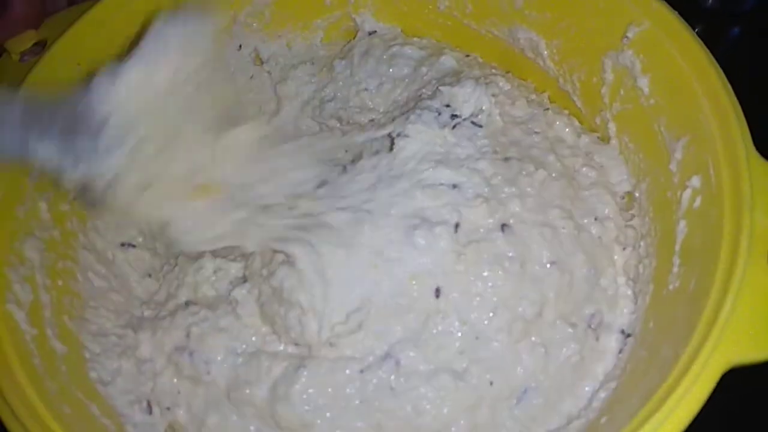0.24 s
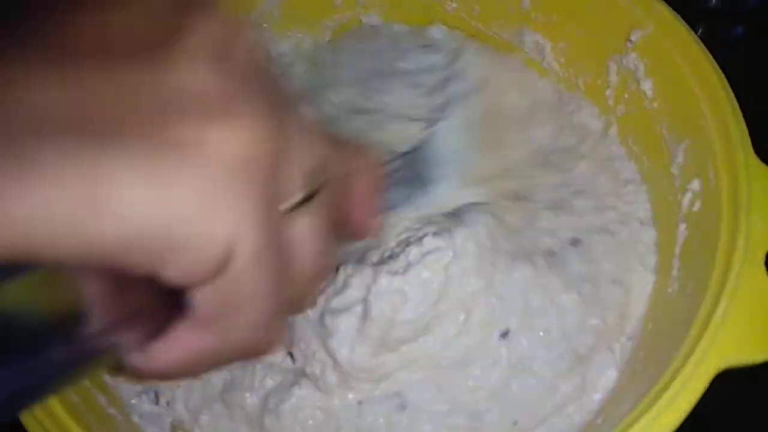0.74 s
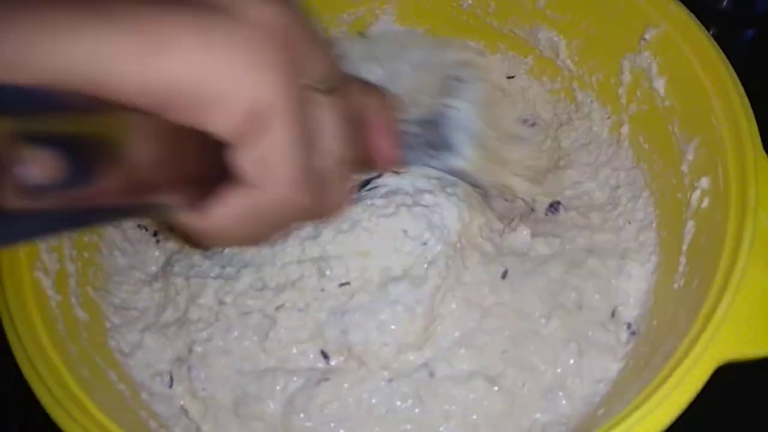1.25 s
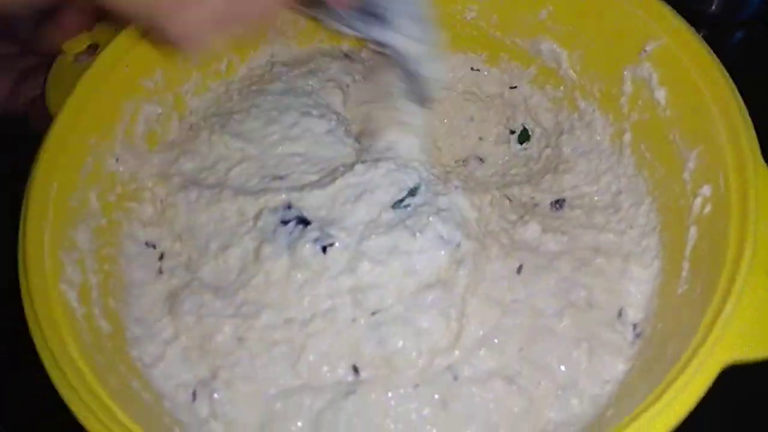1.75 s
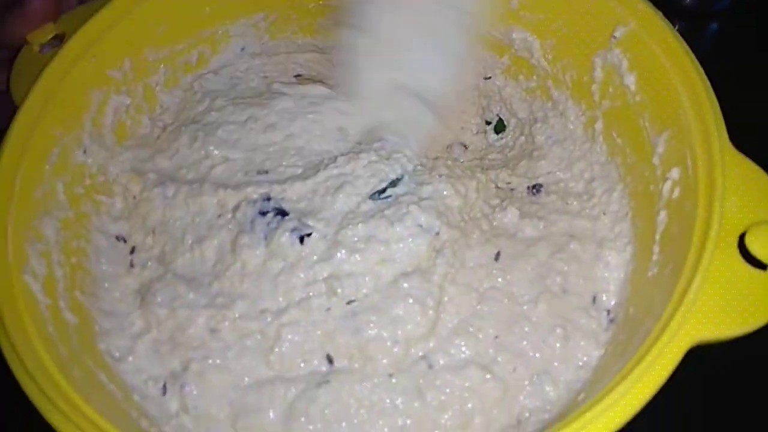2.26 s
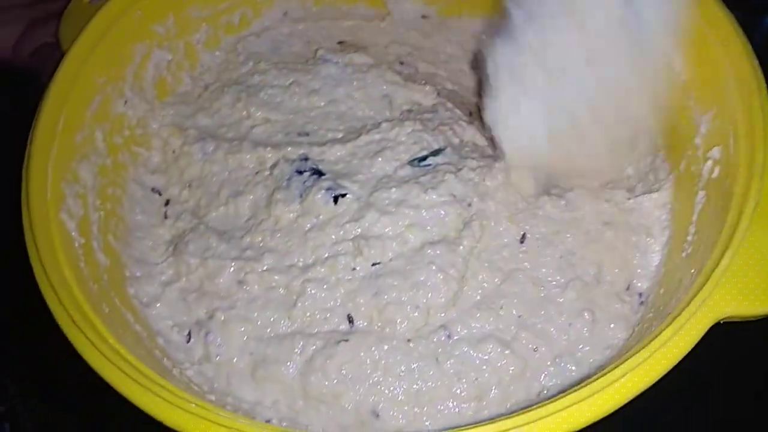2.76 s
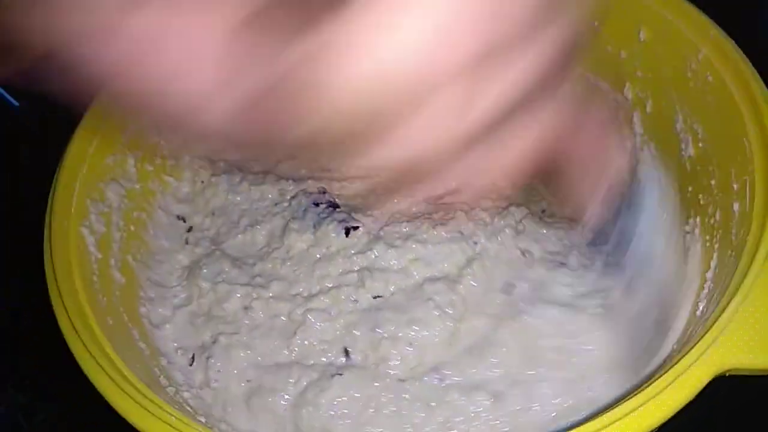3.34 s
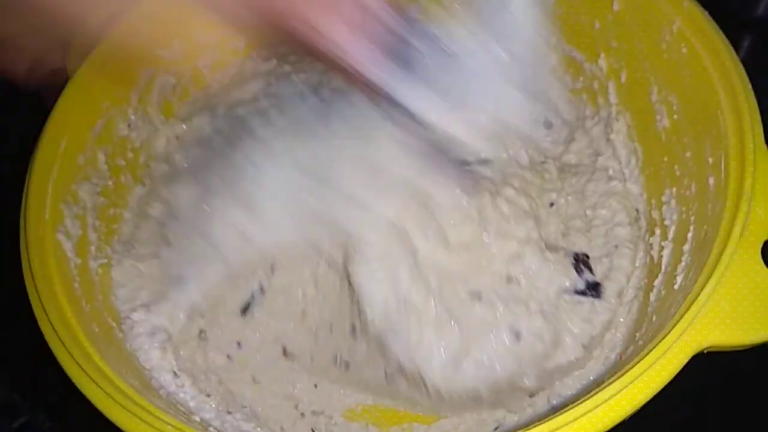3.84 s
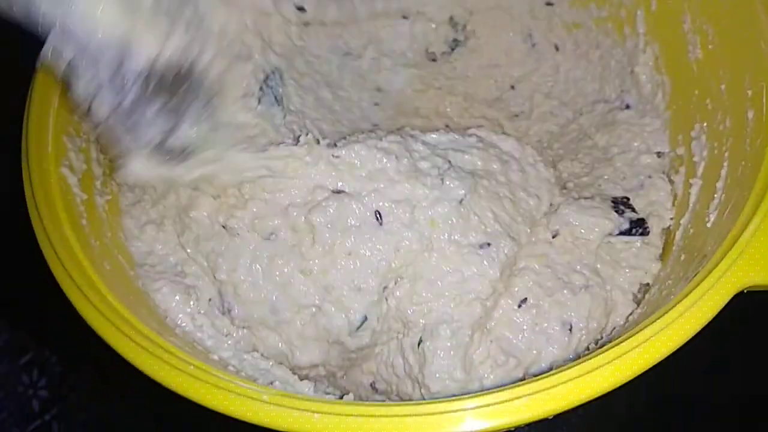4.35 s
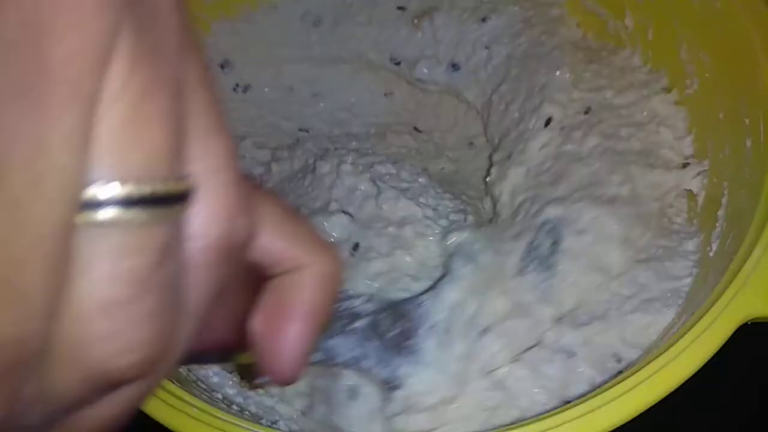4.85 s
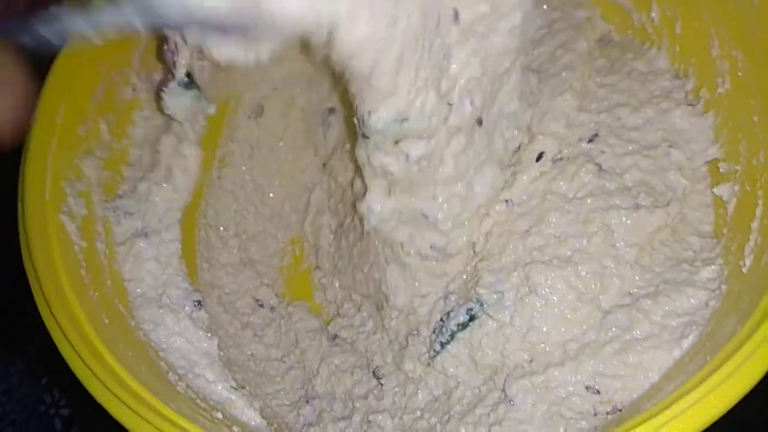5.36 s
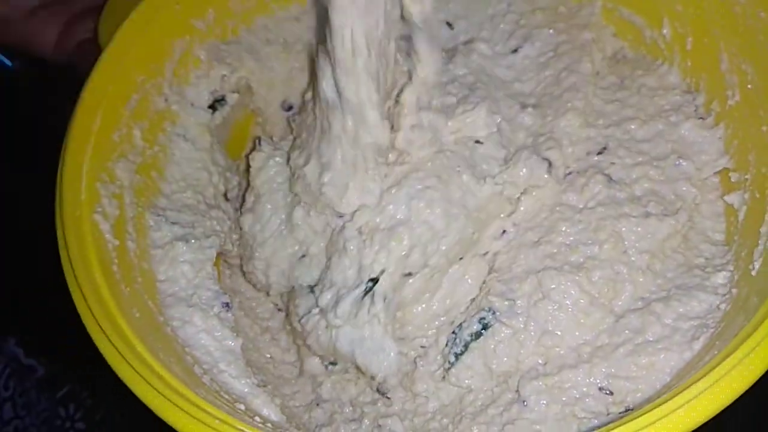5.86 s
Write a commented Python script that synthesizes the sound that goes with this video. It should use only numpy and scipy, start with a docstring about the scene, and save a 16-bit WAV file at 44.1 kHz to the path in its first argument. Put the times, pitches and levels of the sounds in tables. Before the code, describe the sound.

A spoon folds thick wet batter in a plastic bowl, with sticky squelches, fine bubbly crackle and occasional dull knocks, close up in a small kitchen.

```python
"""Thick wet batter folded with a spoon in a plastic bowl, heard close by in a small hard-walled kitchen.
Each push squeezes the batter into a squelch and tears it open in a crackle of tiny bubbles.
Larger films snap, heavier flaps smack, trapped air gurgles and the bowl rubs in two low tones.
The spoon knocks the bowl, which thumps and judders; wall echoes and low room modes ring on over faint noise."""
import sys
import numpy as np
from scipy import signal
from scipy.fft import rfft, irfft
from scipy.io import wavfile
from scipy.ndimage import map_coordinates

SR = 44100
rng = np.random.default_rng(int(sys.argv[2]) if len(sys.argv) > 2 else 0)


def store_wav(level_fs):
    """Save 16-bit WAV to argv[1]."""
    pcm = np.round(np.clip(np.atleast_2d(level_fs), -1, 1) * 32767)
    wavfile.write(sys.argv[1], SR, pcm.T.astype(np.int16))


N = 269451
TIME = np.arange(N) / SR
TOP_HZ = 16000


def amp(db):
    """Decibels to gain."""
    return 10 ** (np.asarray(db) / 20)


def unit(x):
    """Scale to rms 1."""
    return x / np.sqrt(np.mean(x ** 2))


def lookup(points, hz):
    """Read (Hz, value) points on a log-frequency axis."""
    f, value = np.transpose(points)
    return np.interp(np.log(np.maximum(hz, 1)), np.log(f), value)


def convolve(x, response):
    """Pass a sound through an impulse response."""
    return signal.oaconvolve(x, response)[:len(x)]


def colour(x, points, size=2048):
    """Minimum-phase filter through (Hz, dB) points, built by folding the cepstrum."""
    hz = np.arange(size // 2 + 1) * SR / size
    cepstrum = irfft(np.log(amp(lookup(points, hz))))
    cepstrum[1:size // 2] *= 2
    cepstrum[size // 2 + 1:] = 0
    return convolve(x, irfft(np.exp(rfft(cepstrum))))


def band(x, hz, ratio, order=1):
    """Band-pass from hz / ratio to hz * ratio, capped at TOP_HZ; rms 1."""
    edges_hz = [hz / ratio, min(hz * ratio, TOP_HZ)]
    return unit(signal.sosfilt(signal.butter(order, edges_hz, "band", fs=SR, output="sos"), x))


def fade(t, t60):
    """Exponential decay, 60 dB down after t60."""
    return np.exp(-np.log(1000) * t / t60)


def ring(t, hz, t60):
    """One damped mode."""
    return np.sin(2 * np.pi * hz * t) * fade(t, t60)


def add(track, s, sound):
    """Mix a sound in at time s."""
    start = max(int(s * SR), 0)
    track[start:start + len(sound)] += sound[:N - start]


def prickle(per_s, spread_db):
    """Air cells too small to ring: bare clicks of very uneven size."""
    born = rng.random(N) < per_s / SR
    size = amp(-spread_db * np.log(rng.random(N) + .01))
    return born * size * rng.choice([-1, 1], N)


def bubbles(low_hz, high_hz, per_s, spread_db, cycles, rise):
    """Rain of short-lived bubbles, each rising in pitch as it opens; most are tiny, a few stand out."""
    out = np.zeros(N)
    for when, pitch, size, life in rng.random((int(per_s * N / SR), 4)):
        hz = min(low_hz * (high_hz / low_hz) ** pitch, TOP_HZ)
        t60 = cycles * (.5 + life) / hz
        t = TIME[:int(t60 * SR) + 2]
        level = amp(-spread_db * np.log(size + .01)) * np.sqrt(hz)
        tone = np.sin(2 * np.pi * hz * t * (1 + rise * t / t60))
        add(out, when * N / SR, level * tone * fade(t, t60))
    return out


def clumps(per_s, depth_db):
    """Uneven gain, rms 1: random dB levels joined by straight lines between random times."""
    knots = np.cumsum(rng.exponential(1 / per_s, int(2 * per_s * N / SR)))
    return unit(amp(depth_db * np.interp(TIME, knots, rng.standard_normal(len(knots)))))


BITE_T60_S = 0.14


def swell(t, attack_s, length_s, bite, sag_db_per_s, release_db_per_s):
    """Gain over one push: swells, bites hardest at first, sags, then falls faster after length_s."""
    onset = np.minimum(t / attack_s, 1) * (1 + bite * fade(t, BITE_T60_S))
    return onset * amp(-sag_db_per_s * t - release_db_per_s * np.maximum(t - length_s, 0))


# spoon pushes into batter, which goes on tearing behind it: t/s, attack/s, pressing length/s,
# tearing length/s, relative levels of fine crackle/dB, coarse crackle/dB, squelch/dB, hollow f/Hz
PUSHES = [(0.0, 0.0009, 0.043, 0.2, -43.5, -47.5, -44, 720),
          (0.249, 0.042, 0.18, 0.24, -40, -43.5, -44.5, 770),
          (0.638, 0.0086, 0.03, 0.058, -57.5, -69, -74, 700),
          (0.696, 0.0061, 0.088, 0.087, -45.5, -45, -56.5, 700),
          (0.784, 0.014, 0.045, 0.013, -36.5, -54.5, -35, 517),
          (0.862, 0.053, 0.08, 0.095, -38.5, -52, -39.5, 606),
          (1.107, 0.026, 0.12, 0.086, -48, -54.5, -50.5, 660),
          (1.233, 0.078, 0.11, 0.19, -36.5, -35.5, -38.5, 970),
          (1.731, .005, 0.18, 0.049, -39.5, -52, -34, 544),
          (1.771, 0.0073, .025, 0.016, -24, -58, -49.5, 750),
          (2.189, 0.03, 0.19, 0.19, -35.5, -36.5, -33, 740),
          (2.68, 0.0028, 0.16, 0.14, -35, -37.5, -25, 682),
          (3.14, 0.0074, 0.23, 0.16, -41.5, -41.5, -36, 538),
          (3.329, 0.011, 0.063, 0.074, -40.5, -38.5, -49, 900),
          (3.408, 0.026, 0.23, 0.28, -34, -43.5, -34.5, 650),
          (3.797, .03, 0.051, 0.066, -58, -62, -75, 790),
          (3.878, 0.013, 0.059, 0.037, -44, -48.5, -46, 900),
          (3.957, .004, 0.091, .15, -43.5, -50.5, -37, 500),
          (4.069, 0.045, 0.09, 0.13, -42, -45, -45.5, 730),
          (4.378, 0.025, 0.26, 0.24, -50, -56.5, -59.5, 1250),
          (4.586, .015, 0.11, 0.12, -50, -54.5, -49, 780), (4.715, 0.053, 0.13, 0.14, -51, -52, -47, 860),
          (4.861, 0.011, 0.027, 0.056, -48, -42.5, -42.5, 620),
          (4.895, 0.033, 0.21, 0.25, -35, -38.5, -35, 656),
          (5.038, 0.04, 0.12, 0.067, -35, -42, -38.5, 680),
          (5.241, 0.022, 0.13, 0.12, -44.5, -52.5, -42, 620),
          (5.481, 0.0081, 0.3, 0.15, -59.5, -53, -64.5, 650),
          (5.702, 0.011, 0.053, 0.1, -52, -49, -47, 490),
          (5.982, 0.0034, 0.0095, 0.066, -45, -40, -34, 620)]


def effort(lengths_s, levels_db, bite, sag_db_per_s, release_db_per_s):
    """Gain of one layer over all pushes; overlapping pushes add in power."""
    power, t = np.zeros(N), TIME[:SR * 2 // 3]
    for (s, attack_s, *_), length_s, db in zip(PUSHES, lengths_s, levels_db):
        gain = amp(db) * swell(t, attack_s, length_s, bite, sag_db_per_s, release_db_per_s)
        add(power, s, gain ** 2)
    return np.sqrt(power)


# filters on the fine and coarse bubble layers: f/Hz, relative gain/dB
FINE_COLOUR = [(2000, -19.5), (3800, -8), (4900, 5), (6500, 4), (9500, 9), (12000, 11), (14000, 8),
               (16000, -1)]
COARSE_COLOUR = [(1000, -15.5), (1800, -19), (2300, -11.5), (3200, -4.5), (4000, -4.5), (6000, -10.5),
                 (12000, -26)]
FINE_SAG_DB_PER_S, FINE_RELEASE_DB_PER_S = 26.5, 161  # tiny cells keep bursting longest
COARSE_SAG_DB_PER_S, COARSE_RELEASE_DB_PER_S = 26, 299.5


def crackle():
    """Torn batter opens thousands of tiny air cells, with sticky ticks and coarser bubbles among them."""
    cells = prickle(per_s=2200, spread_db=4) * clumps(per_s=170, depth_db=2.8)
    ticks = bubbles(5000, 14000, per_s=190, spread_db=3.8, cycles=6, rise=.06)
    coarse = bubbles(1700, 5200, per_s=1100, spread_db=3.4, cycles=8, rise=.1)
    fine = unit(colour(cells, FINE_COLOUR)) + unit(colour(ticks, FINE_COLOUR))
    fine = amp(-8.5) * unit(fine)
    coarse = amp(-14.5) * unit(colour(coarse, COARSE_COLOUR))
    _, _, press_s, tear_s, fine_db, coarse_db, _, _ = np.transpose(PUSHES)
    tearing = effort(tear_s, fine_db, 1.0, FINE_SAG_DB_PER_S, FINE_RELEASE_DB_PER_S)
    opening = effort(press_s, coarse_db, 0.19, COARSE_SAG_DB_PER_S, COARSE_RELEASE_DB_PER_S)
    return fine * tearing + coarse * opening


# resonance of the hollow behind the spoon: multiple of hollow f, relative gain/dB
HOLLOW_SHAPE = [(0.3, -12.5), (0.68, -11.5), (1.0, 3), (1.5, -0.5), (2.1, -4), (2.9, -2.5), (4.7, -6.5),
                (8, -17), (17, -41.5)]
SQUELCH_SAG_DB_PER_S, SQUELCH_RELEASE_DB_PER_S = 41.5, 321


def squelch():
    """Pressed batter shears in a dense sticky rasp, coloured by the hollow each push opens behind the spoon."""
    shear = unit(prickle(per_s=2600, spread_db=3.4)) * clumps(per_s=90, depth_db=3.2)
    pockets = unit(bubbles(400, 3200, per_s=600, spread_db=3.2, cycles=8, rise=.12))
    out, t = np.zeros(N), TIME[:SR * 2 // 3]
    for s, attack_s, press_s, _, _, _, db, hz in PUSHES:
        grains = np.roll(shear + pockets, -int(s * SR))[:len(t)]
        shape = [(hz * multiple, gain_db) for multiple, gain_db in HOLLOW_SHAPE]
        hollow = unit(colour(grains, shape))
        gain = swell(t, attack_s, press_s, 0.72, SQUELCH_SAG_DB_PER_S, SQUELCH_RELEASE_DB_PER_S)
        add(out, s, amp(db - 15.5) * hollow * gain)
    return out


# larger batter films bursting: t/s, relative level/dB, bubble starting f/Hz
SNAPS = [(0.051, -13.5, 4600), (0.059, -16.5, 10400), (0.096, -20, 8500), (0.118, -12, 11200),
         (0.1421, -13, 10300), (0.2636, -22, 9600), (0.277, -16, 8790), (0.2818, 8, 4560),
         (0.371, -8.5, 8960), (0.495, -20, 12100), (0.693, -29, 9400), (0.816, -9.5, 5170),
         (0.9025, -12.5, 9200), (1.0566, -20.5, 11000), (1.082, -26, 8100), (1.193, -22.5, 12000),
         (1.242, -11.5, 3500), (1.2631, -1.5, 3300), (1.2634, -3, 10500), (1.27, 1.5, 6540),
         (1.3025, -22, 3220), (1.3218, -12, 11100), (1.3875, -16.5, 10440), (1.5309, -25, 9830),
         (1.782, 2, 9800), (2.261, -6, 3970), (2.3205, -24, 9050), (2.6832, 0.5, 10800),
         (2.8214, -9.5, 4190), (3.1466, -19, 4620), (3.325, 0.5, 4020), (3.419, 8.5, 3130),
         (3.4212, 5.5, 6200), (3.4907, -9, 11120), (3.5228, 0.5, 11500), (3.621, -15, 10700),
         (3.8931, -13.5, 9550), (3.961, -16.5, 9350), (4.117, -16.5, 4700), (4.175, -18, 9890),
         (4.283, -29, 12800), (4.3963, -31.5, 11360), (4.504, -22, 9000), (4.597, -24.5, 12200),
         (4.838, -28, 10800), (4.873, -27, 9600), (4.9212, 1.5, 3050), (5.0800, -8, 11700),
         (5.117, -11.5, 11600), (5.496, -25, 5000), (5.7454, -13, 8620), (5.989, -4.5, 7770)]
# filter on all snaps: f/Hz, gain/dB
SNAP_COLOUR = [(300, -15.5), (1000, -14), (2200, -7), (3200, 0), (4800, 3.5), (7000, 5.5), (13000, 7.5),
               (16000, -5)]


def snaps():
    """A thin film cracks in a brief rasp; the bubble behind it rings and rises as it opens."""
    out, t = np.zeros(N), TIME[:SR // 20]
    for s, db, hz in SNAPS:
        rasp = band(rng.standard_normal(len(t)), hz, ratio=2.1) * fade(t, 0.005)
        cavity = np.sin(2 * np.pi * hz * t * (1 + 6 * t)) * fade(t, 24 / hz)
        add(out, s, amp(db) * unit((rasp + 1.2 * cavity) * (1 - fade(t, 0.0039))))
    return amp(-37.5) * colour(out, SNAP_COLOUR)


# batter slapping and letting go of the spoon: t/s, relative level/dB, cavity f/Hz, length/s
SMACKS = [(0.116, -41.5, 835, 0.0034), (0.139, -52, 1100, 0.0051), (0.28, -32, 886, 0.0047),
          (0.2815, -31.5, 4800, 0.0048), (0.423, -51, 1350, 0.0052), (0.7911, -23, 576, 0.0025),
          (0.927, -54, 1280, 0.012), (1.139, -55.5, 950, 0.0066), (1.306, -50.5, 1155, 0.015),
          (1.7358, -24.5, 730, 0.003), (1.736, -33.5, 2140, 0.0035), (1.836, -40.5, 2340, 0.01),
          (2.223, -49, 1400, 0.005), (2.259, -30, 1410, 0.003), (2.318, -36.5, 2230, 0.0025),
          (2.322, -46, 1130, 0.0096), (2.357, -38.5, 803, 0.017), (2.366, -45, 2130, 0.011),
          (2.384, -40, 2080, 0.0049), (2.4, -39.5, 746, 0.005), (2.398, -43.5, 2620, 0.0049),
          (2.757, -38, 920, 0.0081), (2.768, -32, 1065, 0.011), (2.768, -33.5, 2410, 0.0073),
          (2.808, -40, 2160, 0.013), (3.505, -31.5, 545, 0.0015), (4.396, -58, 1407, 0.024),
          (4.451, -60.5, 1380, 0.014), (4.548, -62, 1000, 0.006), (4.616, -60, 966, 0.0083),
          (4.68, -60, 1660, 0.0067), (4.77, -56, 2430, 0.012), (4.971, -38.5, 2880, 0.012),
          (5.045, -35, 617, 0.003), (5.046, -49, 2450, 0.0036), (5.136, -39, 730, 0.0065),
          (5.249, -47.5, 665, 0.0037), (5.296, -51.5, 795, 0.0059), (5.487, -61.5, 650, 0.012),
          (5.988, -40, 670, 0.0047)]


def smacks():
    """Heavier flaps of batter peel apart in a ragged smack, coloured by the cavity between them."""
    out, t = np.zeros(N), TIME[:SR // 15]
    for s, db, hz, length_s in SMACKS:
        tear = rng.standard_normal(len(t)) * amp(4 * rng.standard_normal(len(t)))
        tear = tear * (1 - fade(t, 0.004)) * np.exp(-(t / length_s) ** 4)
        smack = band(tear, hz, ratio=1.1, order=2)
        smack = smack + amp(-7) * band(tear, hz * 0.89, ratio=2.0, order=2)
        add(out, s, amp(db) * unit(smack) * np.sqrt(length_s / t[-1]))
    return out


# trapped air bubbling out; the two near 5.25 s are low tones of the bowl rubbing:
# t/s, length/s, first f/Hz, last f/Hz, relative level/dB, roughness (clipped to 0-1)
GURGLES_AND_RUBS = [(0.727, 0.055, 323, 344, -54.5, 1.1), (1.324, 0.062, 255, 253, -60, 0.62),
                    (2.199, 0.019, 328, 337, -46, 0.17), (2.362, 0.05, 839, 729, -49, 0.78),
                    (3.005, 0.085, 1094, 982, -51.5, 0.94), (3.07, 0.078, 652, 448.5, -49.5, 0.57),
                    (3.175, 0.054, 840, 826, -43, 0.12), (3.218, 0.04, 1270, 1240, -53.5, 0.65),
                    (3.27, 0.048, 860, 803, -62, 0.24), (4.89, 0.014, 140, 135, -47, 0.35),
                    (5.245, 0.097, 333.7, 361, -52.5, 0.32), (5.286, 0.063, 482, 510, -57, 0.38),
                    (5.713, 0.032, 404, 370, -47, 0.9), (5.714, 0.025, 658, 704, -56, 0.34)]


def gurgles_and_rubs():
    """Sliding tones, clear when steady and rough when uneven: escaping air, and twice the bowl rubbing."""
    out, t = np.zeros(N), TIME[:SR // 4]
    for s, length_s, first_hz, last_hz, db, rough in GURGLES_AND_RUBS:
        phase = 2 * np.pi * np.cumsum(np.interp(t, [0, length_s], [first_hz, last_hz])) / SR
        slow = signal.butter(4, 0.19 * first_hz, fs=SR, output="sos")
        a, b = unit(signal.sosfilt(slow, rng.standard_normal((2, len(t)))))
        rough = np.clip(rough, 0, 1)
        tone = (1 - rough + rough * a) * np.sin(phase) + rough * b * np.cos(phase)
        envelope = (1 - fade(t, 0.038)) * fade(np.maximum(t - length_s, 0), 0.05)
        add(out, s, amp(db) * unit(tone * envelope) * np.sqrt(length_s / t[-1]))
    return out


# spoon meets bowl: t/s, relative clack level/dB, clack tilt/(dB per octave), relative thump level/dB,
# loaded bowl f/Hz, relative judder level/dB, judder length/s
KNOCKS = [(0.28, -24, 5, -37.5, 316, -49.5, 0.071), (0.791, -14, 0, -18, 263, -36, 0.074),
          (0.837, -52, -18, -57, 236, -57, 0.026), (1.7383, -18, -2, -21.5, 294.5, -35, 0.073),
          (2.192, -51, 5, -60.5, 360, -79.5, .05), (2.684, -17, 4.5, -23, 335, -35, 0.078),
          (3.148, -23, -4.5, -27, 266.7, -36.5, 0.077), (3.471, -27.5, 2, -31, 239, -47, 0.098),
          (3.962, -22, -3.5, -22, 241.5, -49, 0.093), (4.008, -53, 7, -35.5, 231, -66, 0.03),
          (4.075, -41.5, -7, -57, 259, -62.5, .02), (4.873, -36, 2, -43, 374, -51.5, 0.091),
          (4.992, -25.5, 1.5, -27, 249, -53, 0.084), (5.113, -27.5, 0, -31, 257, -79, 0.06),
          (5.714, -34, -6, -41.5, 397, -76, 0.056), (5.991, -42, 6, -74.5, 400, -63, 0.043)]
# plastic contact filter before tilt: f/Hz, relative gain/dB
CLACK_COLOUR = [(100, -13), (300, 1.5), (620, 7.5), (880, 5.5), (1350, -0.5), (1700, -11.5), (2200, -4.5),
                (3000, -12), (6000, -23.5), (15000, -26.5)]
# bowl modes damped by the load: multiple of bowl f, relative level/dB, t60/s
BOWL_MODES = [(0.553, -18.5, 0.048), (0.9, -8, 0.12), (1.003, 1.5, 0.065), (1.07, 5.5, 0.047),
              (1.35, 1, 0.083), (1.85, -10.5, 0.056), (2.3, -13, 0.012)]
WALL_ECHO_S, WALL_ECHO_DB = 0.012, -12


def knocks():
    """Spoon lands through the batter: short plastic clack, loaded bowl thumps; a near wall returns the clack."""
    out, t = np.zeros(N), TIME[:SR // 4]
    for s, clack_db, tilt_db_per_octave, thump_db, hz, _, _ in KNOCKS:
        bowl = sum(amp(db) * ring(t, hz * multiple, t60) for multiple, db, t60 in BOWL_MODES)
        # the blow, then the spoon drags on
        push = (t == 0) + 0.008 * rng.standard_normal(len(t)) * fade(t, 0.31)
        thump = convolve(push, bowl) * (1 - fade(t, 0.025))
        contact = [(f, db + tilt_db_per_octave * np.log2(f / 1000)) for f, db in CLACK_COLOUR]
        hit = (t == 0) + 0.06 * rng.standard_normal(len(t)) * fade(t, 0.028)
        clack = amp(clack_db - 23.0) * unit(colour(hit, contact))
        add(out, s, amp(thump_db - 17.5) * unit(thump) + clack)
        add(out, s + WALL_ECHO_S, amp(WALL_ECHO_DB) * clack)
    return out


JUDDER_HZ = 133.5  # rate that the slipping bowl slows to


def judder():
    """Shoved bowl sticks and slips unevenly on its support: quick at first, slowing, then stopping."""
    out, t = np.zeros(N), TIME[:SR // 5]
    for s, _, _, _, hz, db, length_s in KNOCKS:
        shove = (1 - fade(t, 0.15)) * (1 - np.tanh((t - length_s) / 0.012)) / 2
        rate_hz = JUDDER_HZ + (hz - JUDDER_HZ) * fade(t, 0.077)
        wander = np.cumsum(0.024 * rng.standard_normal(len(t)))
        phase = 2 * np.pi * np.cumsum(rate_hz) / SR + wander
        slips = sum(np.cos(k * phase) / k ** 2.5 for k in range(1, 6))
        add(out, s, amp(db + 3.0) * slips * shove)
    return out * clumps(per_s=110, depth_db=2.5)


ECHO_DRIFT_HZ = 5


def scatter(x, t60, count=4):
    """Bowl wall throws treble back within 20 ms, differently to each port; the mix of paths cycles steadily."""
    t, out = TIME[:SR // 50], 0
    treble = signal.sosfilt(signal.butter(2, 1500, "high", fs=SR, output="sos"), x)
    for k in range(count):
        share = np.sqrt(2 / count) * np.cos(np.pi * (2 * ECHO_DRIFT_HZ * TIME + k / count))
        echoes = rng.standard_normal((2, len(t))) * fade(t, t60)
        out = out + np.array([convolve(treble * share, side / np.linalg.norm(side)) for side in echoes])
    return out


def pair(x, y, alike_hz):
    """Two noises as left and right: alike in the bass, unrelated in the treble."""
    side = signal.sosfilt(signal.butter(1, alike_hz, "high", fs=SR, output="sos"), y)
    return np.array([x + side, x - side]) / np.sqrt(2)


# echo decay: f/Hz, t60/s
ROOM_T60 = [(150, 0.39), (700, 0.3), (2500, 0.33), (8000, 0.16), (15000, 0.29)]
# echo spectrum: f/Hz, relative level/dB
ROOM_COLOUR = [(80, -5), (190, -13.5), (300, -3.5), (700, -4), (2500, 0.5), (8000, 6.5), (15000, 4.5)]


def kitchen(x, count=9):
    """Dense echoes off near walls: stereo noise split into bands, each with its own level and decay."""
    t = TIME[:SR * 2 // 3]
    noise = rfft(pair(*rng.standard_normal((2, len(t))), alike_hz=610))
    f = np.arange(noise.shape[1]) * SR / len(t)
    centres_hz, tail = np.geomspace(80, TOP_HZ, count), 0
    for hz, share in zip(centres_hz, np.eye(count)):
        part = irfft(noise * lookup(np.column_stack([centres_hz, share]), f), len(t))
        tail = tail + part * fade(t, lookup(ROOM_T60, hz)) * amp(lookup(ROOM_COLOUR, hz))
    tail = unit(tail * (1 - fade(t, 0.063))) / np.sqrt(len(t))
    return np.array([convolve(x, side) for side in tail])


# low standing waves between walls: f/Hz, relative level/dB, t60/s
ROOM_MODES = [(132, 0, 0.36), (141, -4, .46), (154, -3.5, 0.44), (236, 0, .22), (256, 1.5, .22),
              (275, 3, .3), (346, -6, .2)]


def boom(x):
    """Room standing waves pick up low sound and hum on; peak gain 1."""
    t = TIME[:SR * 2 // 3]
    waves = sum(amp(db) * ring(t, hz, t60) for hz, db, t60 in ROOM_MODES)
    return convolve(x, waves / np.abs(rfft(waves)).max())


# background noise spectrum: f/Hz, relative level/(dB per Hz)
QUIET = [(25, -20), (80, -12), (135, 9.5), (200, -8.5), (330, 2), (600, -12.5), (1500, -21), (5000, -27),
         (15000, -22.5)]


def background():
    """Steady faint noise, shaped in frequency, alike in the bass on both sides."""
    noise = pair(*rng.standard_normal((2, N)), alike_hz=500)
    return amp(-70.5) * unit(np.array([colour(side, QUIET) for side in noise]))


def scene():
    """Batter, spoon and bowl, heard directly and through bowl and room echoes."""
    fizz, squeeze, snap, smack = crackle(), squelch(), snaps(), smacks()
    tones, knock, shudder = gurgles_and_rubs(), knocks(), judder()
    body = fizz + squeeze + smack + tones + knock + shudder
    sent = amp(1.5) * knock + amp(0.5) * (fizz + squeeze + smack + tones) + amp(-15.5) * snap
    bowl_echo = amp(5.5) * scatter(body, t60=0.026) + amp(-6) * scatter(snap, t60=0.029)
    room = kitchen(sent) + amp(3) * boom(shudder + knock)
    return body + snap + bowl_echo + room + background()


# port colour, left brighter at the top: f/Hz, left minus right level/dB
PORTS = [(100, -2), (300, -3.5), (1200, -6.5), (2200, 0.5), (4500, -1.5), (7000, 1.5), (9500, 13.5),
         (15000, 15)]
PORT_LAG_S, LOW_HZ = .00009, 101  # left port delay; bass cut


def record(dry):
    """Two ports of unlike colour, a little apart; deep bass and top are cut."""
    hz, lean_db = np.transpose(PORTS)
    ports = []
    for x, side in zip(dry, (1, -1)):
        share = 2 / (1 + amp(-2 * side * lean_db))  # of the power, at each frequency
        ports.append(colour(x, np.column_stack([hz, 10 * np.log10(share)])))
    ports[0] = map_coordinates(ports[0], [(TIME - PORT_LAG_S) * SR], order=5)
    thin = signal.sosfilt(signal.butter(4, LOW_HZ, "high", fs=SR, output="sos"), np.array(ports))
    return signal.sosfilt(signal.ellip(8, .2, 70, TOP_HZ, fs=SR, output="sos"), thin)


dry = scene()
out = record(dry)
store_wav(out)
```